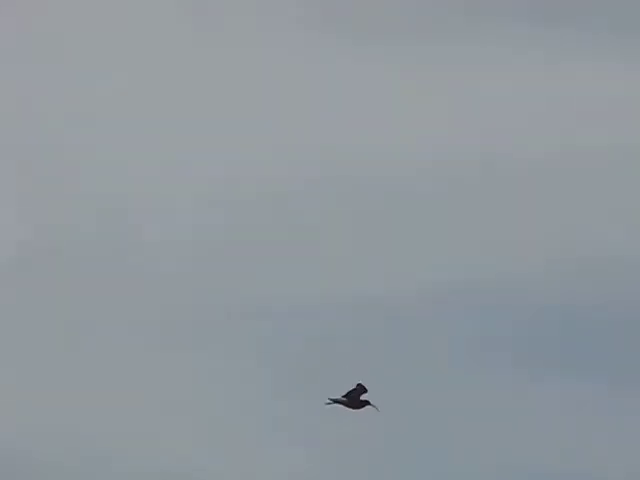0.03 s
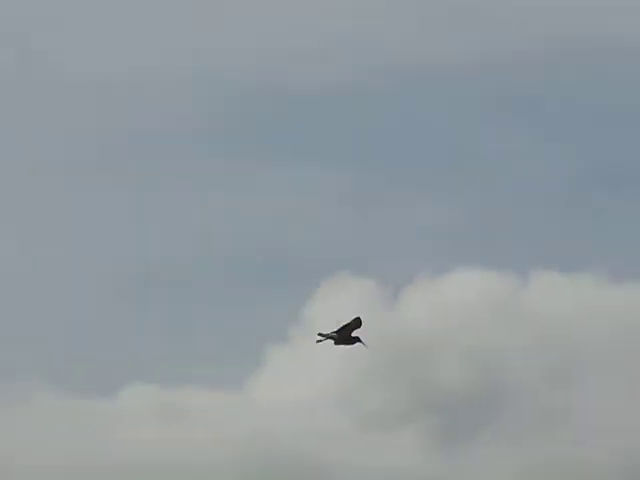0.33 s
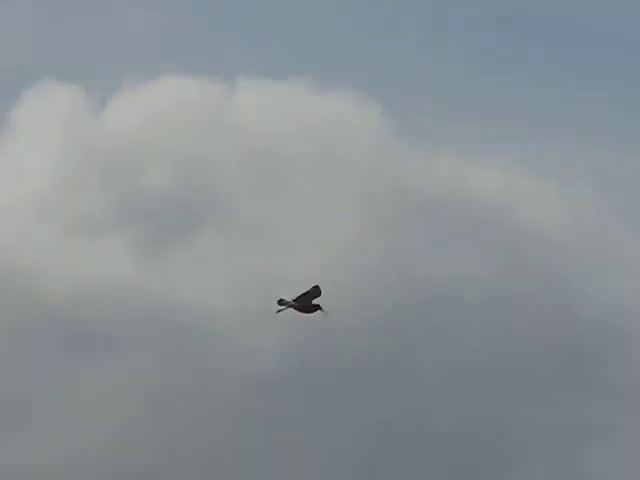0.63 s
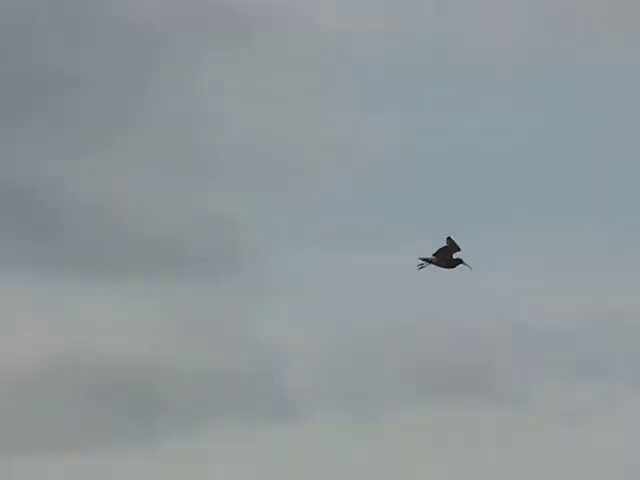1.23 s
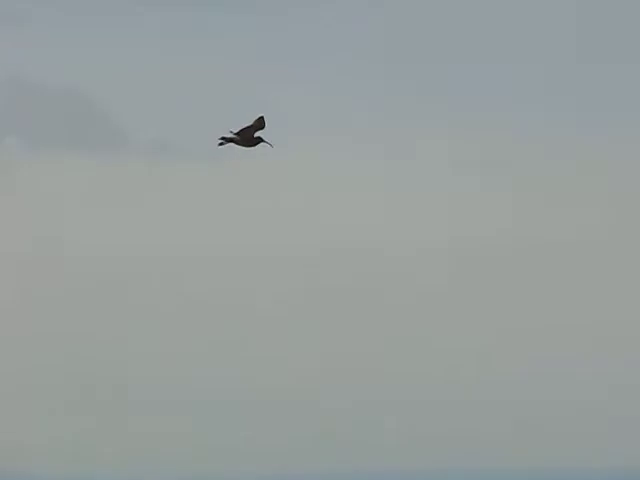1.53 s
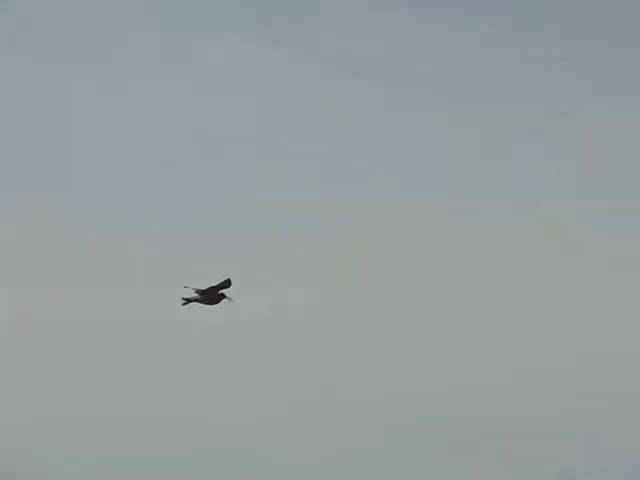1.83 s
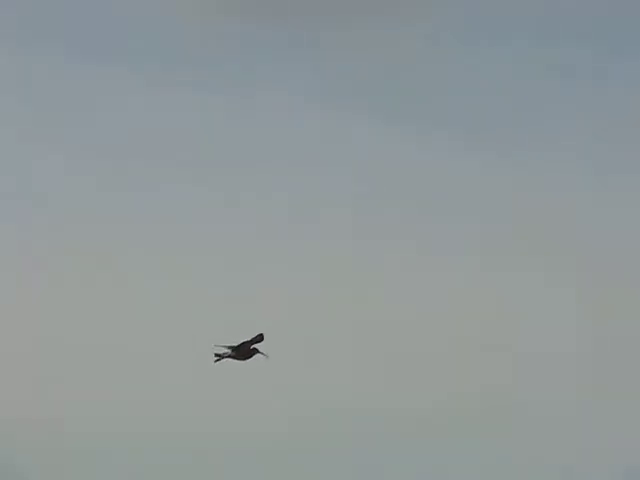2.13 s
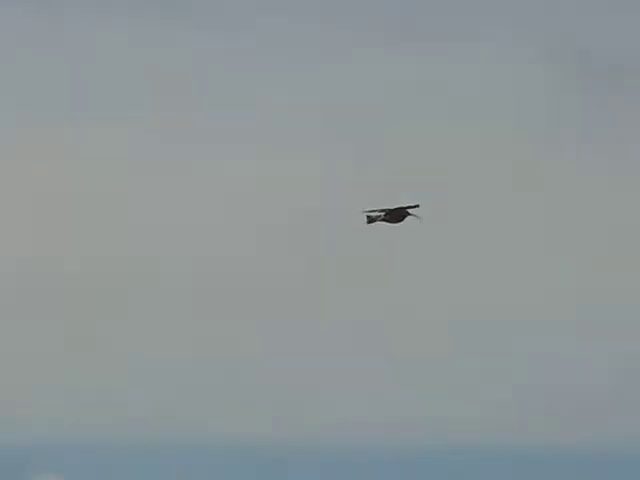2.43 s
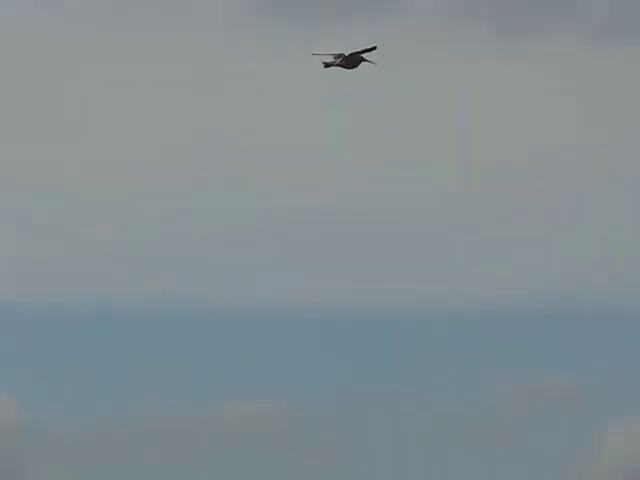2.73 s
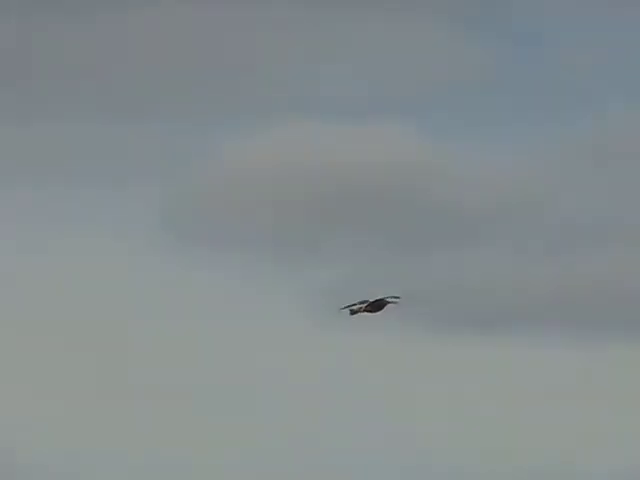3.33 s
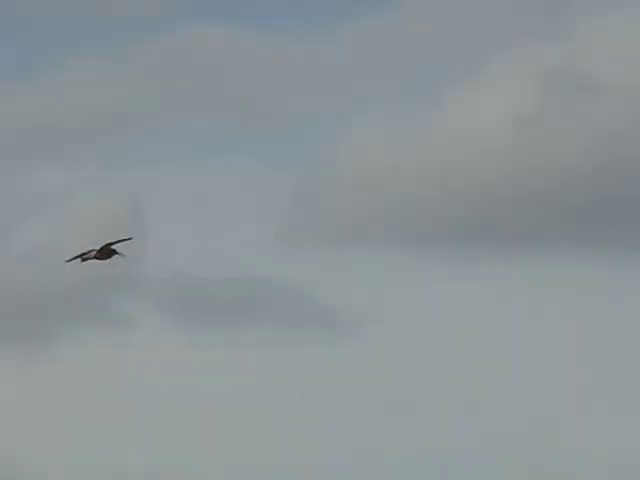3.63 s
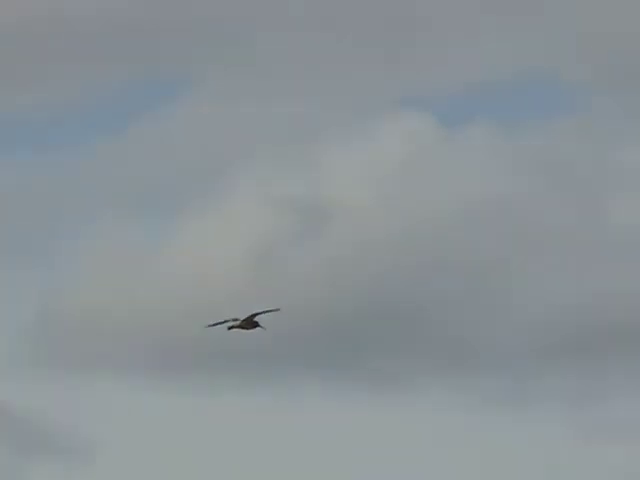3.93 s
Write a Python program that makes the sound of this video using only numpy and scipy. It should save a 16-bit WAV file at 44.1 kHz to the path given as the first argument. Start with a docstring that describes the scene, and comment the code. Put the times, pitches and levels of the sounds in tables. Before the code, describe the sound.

A curlew whistles and quavers in flight while strong wind rumbles on the microphone.

```python
"""A curlew calls in flight over open moorland: clear low whistles break up into a quavering upper
register, then give way to one long level whistle. Each note is a nearly pure tone with weak overtones,
faintly scattered by the ground. Turbulent gusts buffet the two microphone ports, mostly the right one,
and now and then overload the input. Under it all the camera hisses and whines faintly."""
import sys
import numpy as np
from scipy import signal
from scipy.fft import rfft, irfft
from scipy.io import wavfile
from scipy.ndimage import uniform_filter1d

SR = 44100
rng = np.random.default_rng(int(sys.argv[2]) if len(sys.argv) > 2 else 0)


def master(y):
    """Save y as 16-bit WAV."""
    cut = np.clip(np.atleast_2d(y).T, -1, 1)
    pcm = np.round(cut * 32767)  # scale
    wavfile.write(sys.argv[1], SR, pcm.astype(np.int16))


N = 176400
T = np.arange(N) / SR
EDGE_S = .004  # onset and release of a note
PURIFY_DB_PER_S = 12  # fading of the second harmonic against the fundamental

# Overtones of the low register. Each row: multiple of the pitch, relative level in dB.
LOW_OVERTONES = [(2, -28.5), (3, -38), (4, -53)]


def curlew():
    """Air absorption: the bird's two registers add and lose their highest treble on the way."""
    voice = low_whistles() + upper_notes() + register_slips()
    return amp(-1.5) * signal.lfilter(*signal.butter(3, 6440, fs=SR), voice)


def low_whistles():
    """Frequency modulation: each whistle glides along a contour, its overtones strongest at the attack."""
    # One contour per whistle. Each point: time in seconds, pitch in Hz, relative level in dB.
    contours = [
        [(0, 1620, -40), (.062, 1800, -35), (.134, 1828, -34), (.208, 1765, -33.5), (.222, 1990, -40)],
        [(.272, 1570, -38), (.296, 1894, -31), (.318, 1848, -32), (.347, 1920, -35), (.370, 1850, -36),
         (.396, 1927, -30), (.418, 1850, -37), (.435, 2090, -34.5)],
        [(.479, 1630, -37), (.495, 1960, -30.5), (.504, 2053, -30), (.513, 1920, -30), (.520, 2020, -52)],
        [(.657, 1490, -77.5), (.675, 1975, -23), (.685, 2080, -26.5), (.694, 1930, -29.5), (.701, 1970, -36)],
        [(.838, 1880, -31), (.852, 2084, -30), (.868, 1940, -36), (.880, 2205, -46.5), (.896, 2200, -31.5),
         (.914, 1950, -35)],
        [(1.027, 1670, -37.5), (1.062, 1820, -34.5), (1.089, 1747, -33.5), (1.107, 1936, -30.5),
         (1.117, 1944, -31), (1.131, 1730, -34)],
        [(1.518, 1727, -33), (1.572, 1755, -34), (1.579, 1745, -41), (1.586, 1820, -33)],
        [(2.168, 1657, -33.5), (2.212, 1683, -34.5), (2.223, 1690, -39)],
        [(2.702, 1900, -38), (2.726, 1656, -33.5), (2.756, 1816, -33), (2.774, 2126, -31.5), (2.783, 2150, -47)],
        [(2.942, 1610, -31), (3.005, 1556, -36), (3.055, 1682, -34), (3.258, 1738, -32.5), (3.432, 1760, -35),
         (3.576, 1727, -38.5), (3.718, 1608, -41.5), (3.802, 1600, -35.5), (3.830, 1770, -44)],
    ]
    # Timbre of each whistle. Each row: reediness in dB, relative level of the opening rasp in dB.
    timbres = [(-6.5, -74), (0, -54.5), (-3, -68), (4, -50), (2, -48), (0, -53.5), (5, -53), (4.5, -49),
               (-3.5, -88), (2, -48)]
    bite_db, bite_s, rasp_lead_s = 3.5, .02, .0099
    out = np.zeros(N)
    for contour, (reed_db, rasp_db) in zip(contours, timbres):
        times, hz, db = np.transpose(contour)
        t = np.arange(times[0] - EDGE_S / 2, times[-1] + EDGE_S / 2, 1 / SR)
        age = t - t[0]
        pitch = uniform_filter1d(np.interp(t, times, hz), size=300)
        reediness = reed_db + bite_db * np.exp(-age / bite_s) - PURIFY_DB_PER_S * age
        add(out, t[0], whistle(pitch, np.interp(t, times, db), LOW_OVERTONES, reediness))
        add(out, times[0] - rasp_lead_s, amp(rasp_db) * rasp())
    return out


def upper_notes():
    """Vibrato and tremolo: pitch and level quaver in phase, and some notes end in an upward flick."""
    # Upper-register notes. Each row: start and end in seconds, pitch in Hz, arch of the pitch in Hz,
    # relative level in dB, time of a quaver crest in seconds, quaver rate in Hz, flick in Hz and in dB.
    notes = [(.521, 0.613, 2490, 1, -40, 0.33, 13.5, 365, 4.5),
             (0.704, 0.738, 2590, 0, -36.5, .712, 15, 8, 2),
             (0.747, 0.777, 2510, -18, -39, .775, 9.4, 387, 2),
             (.915, 0.951, 2590, 2, -41, .940, 12, 453.5, -1),
             (1.133, 1.169, 2480, 4, -37.5, 1.167, 17, 11, 2),
             (1.18, 1.216, 2500, 7, -39.5, 1.38, 18.4, 3, 2.5),
             (1.235, 1.273, 2475, -14, -44, 1.44, 20, -7, 10),
             (1.29, 1.415, 2453, -4, -40.5, 1.2, 17, 662, 11),
             (1.584, 1.826, 2442, 25.5, -39.5, 1.74, 26.8, 4, 3.5),
             (1.841, 2.053, 2372, 31.5, -40.5, 1.872, 18, 540, 3.5),
             (2.222, 2.703, 2347, 63.5, -43.5, 2.414, 17.6, -13, -4)]
    # Overtones of the upper register. Each row: multiple of the pitch, relative level in dB.
    overtones = [(1.5, -33.5), (2, -27.5), (3, -41.5)]
    quaver_hz, quaver_db = 36.8, 2.5  # depths
    flick_rise_s, flick_hold_s = .027, .010
    out = np.zeros(N)
    for start, end, hz, arch_hz, db, crest, rate, flick_hz, flick_db in notes:
        t = np.arange(start, end, 1 / SR)
        quaver = np.cos(2 * np.pi * rate * (t - crest))
        arch = np.sin(np.pi * (t - start) / (end - start))
        flick_start = end - flick_rise_s - flick_hold_s
        flick = np.sin(np.pi / 2 * np.clip((t - flick_start) / flick_rise_s, 0, 1)) ** 4
        pitch = hz + arch_hz * arch + quaver_hz * quaver + flick_hz * flick
        level = db + quaver_db * quaver + flick_db * flick
        reediness = -flick_db * flick / 2 - PURIFY_DB_PER_S * (t - start)
        add(out, start, whistle(pitch, level, overtones, reediness))
    return out


def register_slips():
    """Register breaks: at some quaver crests the voice falls briefly back into the low register."""
    # Slips of the voice. Each row: start in seconds, relative level in dB.
    slips = [(0.554, -42), (0.726, -30.5), (1.161, -35), (1.212, -30), (1.268, -33.5), (1.758, -43),
             (1.816, -34.5), (2.523, -47)]
    length_s, from_hz, to_hz = .022, 2150, 1680
    progress = np.linspace(0, 1, round(length_s * SR))
    pitch = from_hz + (to_hz - from_hz) * progress ** 1.4
    out = np.zeros(N)
    for start, db in slips:
        add(out, start, whistle(pitch, db - 25 * (progress - .5) ** 2, LOW_OVERTONES))
    return out


def whistle(hz, db, overtones, reed_db=0):
    """A nearly periodic oscillation with jitter and shimmer; reediness lifts higher overtones more."""
    jitter, shimmer_db = .0053, .57
    t = np.arange(len(hz)) / SR
    drift = uniform_filter1d(rng.standard_normal((2, len(t))), size=120)
    pitch_drift, level_drift = uniform_filter1d(drift, size=80)
    phase = 2 * np.pi * np.cumsum(hz * (1 + jitter * unit(pitch_drift))) / SR
    tone = np.sin(phase) + sum(amp(level + reed_db * k / 2) * np.sin(k * phase) for k, level in overtones)
    edges = np.sin(np.pi / 2 * np.clip(np.minimum(t, t[-1] - t) / EDGE_S, 0, 1)) ** 2
    return np.sqrt(2) * tone * edges * amp(db + shimmer_db * unit(level_drift))


def rasp():
    """Onset transient: the voice starts with a rough upward scoop, heard in harmonics 2 to 4."""
    length_s, from_hz, to_hz, jitter, db_per_harmonic = .023, 1270, 1600, .027, -5.5
    progress = np.linspace(0, 1, round(length_s * SR))
    roughness = unit(uniform_filter1d(rng.standard_normal(len(progress)), size=40))
    pitch = (from_hz + (to_hz - from_hz) * progress) * (1 + jitter * roughness)
    phase = 2 * np.pi * np.cumsum(pitch) / SR
    harmonics = sum(amp(db_per_harmonic * (k - 2)) * np.sin(k * phase) for k in range(2, 5))
    return np.sin(np.pi * progress) * harmonics


def ground_scatter(call):
    """Diffuse reflection: the moor returns a faint, short tail that decays exponentially."""
    echo_db, t60_s, rise_s = -16.5, .14, .008
    t = T[:SR // 2]
    tail = rng.standard_normal((2, len(t))) * amp(-60 * t / t60_s) * np.minimum(t / rise_s, 1)
    tail /= np.linalg.norm(tail[0])
    return amp(echo_db) * signal.fftconvolve(call[None], tail, axes=1)[:, :N]


def wind():
    """Turbulence: each port has its own eddies, and a harder push makes a louder, brighter rumble."""
    # Wind strength at the left and right ports. Each row: time in seconds, relative level in dB.
    gusts_left = [(0.0, -31), (0.28, -21.5), (0.37, -34), (0.63, -25), (0.77, -33), (0.9, -21), (0.94, -40),
                  (1.05, -34), (1.12, -68), (1.17, -37), (1.31, -41), (1.36, -17.5), (1.45, -58),
                  (1.49, -17), (1.53, -47), (1.56, -25), (1.65, -48), (1.79, -19), (1.97, -44.5),
                  (2.15, -20), (2.2, -27.5), (2.34, -48), (2.38, -33.5), (2.61, -36), (2.71, -49),
                  (2.76, -35.5), (2.86, -33), (2.94, -15), (3.07, -11.5), (3.24, -31), (3.3, -11.5),
                  (3.34, -55.5), (3.38, -24), (3.41, -52), (3.53, -58), (3.6, -45), (3.65, -67),
                  (3.77, -14), (3.89, -37), (4.0, -28.0)]
    gusts_right = [(0.0, -16), (0.05, -13.5), (0.13, -23), (0.21, -13), (0.25, -18.5), (0.34, -19),
                   (0.4, -14), (0.44, -15.0), (0.64, -24), (0.7, -12.5), (0.75, -22), (0.78, -12.5),
                   (0.8, -18), (0.84, -8.5), (0.93, -21), (1.02, -12), (1.07, -32.5), (1.14, -23),
                   (1.17, -42.5), (1.21, -25.0), (1.24, -33.5), (1.29, -22.5), (1.33, -32), (1.39, -12),
                   (1.46, -17), (1.49, -15), (1.63, -20.5), (1.66, -34), (1.69, -18.5), (1.95, -18.5),
                   (1.97, -22), (2.0, -7.5), (2.11, -16.5), (2.18, -17.5), (2.24, -23.5), (2.27, -11.5),
                   (2.34, -21.5), (2.37, -18), (2.45, -11), (2.47, -22), (2.57, -15.5), (2.66, -20),
                   (2.7, -22.5), (2.76, -31.5), (2.82, -16), (2.87, -24.5), (2.9, -17), (2.97, -17.5),
                   (3.03, -9.5), (3.15, -18.5), (3.3, -14), (3.36, -20), (3.39, -20.5), (3.42, -30.5),
                   (3.48, -31.5), (3.51, -25.5), (3.55, -36.5), (3.63, -28), (3.66, -54), (3.73, -18.5),
                   (3.81, -16.5), (3.9, -13), (3.96, -12), (4.0, -18)]
    # Spectrum of the rumble. Each row: frequency in Hz, relative spectral density in dB.
    rumble_shape = [(15, -15), (40, -10.5), (80, -0.5), (150, 3.5), (300, 0.5), (480, -7.5), (800, -17),
                    (1400, -28.5), (2400, -46), (4000, -72.5), (8000, -95), (15000, -78.5)]
    # Growth of the bands. Each row: centre in Hz, dB gained for each dB of wind.
    steepness = [(40, 0.27), (150, 0.72), (400, 1.05), (1000, 1.3539), (3000, 1.97), (8000, 1.7)]
    usual_db, eddy_db, flutter_db, sputter_db, sputter_from_hz = -18.5, 2.38, 2.52, 3, 860
    centres, slopes = np.transpose(steepness)
    freqs = np.fft.rfftfreq(N, 1 / SR)
    out = np.zeros((2, N))
    for port, gusts in enumerate((gusts_left, gusts_right)):
        push_db = np.interp(T, *np.transpose(gusts)) - usual_db
        push_db += eddy_db * wander(hz=38.2) + flutter_db * wander(hz=172)
        rumble = noise(rumble_shape)
        spectrum = rfft(rumble)
        # The treble sputters at random and flaps with each pressure swing.
        swings = unit(uniform_filter1d(abs(signal.hilbert(rumble)), size=90))
        flap_db = sputter_db * wander(hz=130) + 20 * np.log10(swings)
        for share, hz, slope in zip(np.eye(len(centres)), centres, slopes):
            band = irfft(spectrum * log_interp(np.c_[centres, share], freqs), N)
            flapping = unit(amp(flap_db / (1 + (sputter_from_hz / hz) ** 2)))
            out[port] += band * amp(slope * push_db) * flapping
    return amp(-17) * out


def buffets():
    """Pressure pulses: a gust gives one low thump, with a short, dull crack of input overload."""
    # Sharp gusts. Each row: time in seconds, relative levels of thump and overload crack in dB,
    # left minus right in dB.
    sharp_gusts = [(0.172, -1, -36.5, -29), (.206, -12, -50, -10), (0.396, -6.5, -43, -6),
                   (0.667, -18, -39, -14), (.776, -0.5, -26.5, -34), (0.827, -19, -27.5, -16),
                   (0.837, -6.5, -30, -27), (0.843, -2, -19, -26), (.852, 0.5, -33, -9),
                   (.900, -3, -39, 22), (1.396, -5.5, -51, -23), (1.876, -6.5, -50, -27),
                   (2.000, -10.5, -49, -24), (2.019, -14, -40, -25), (2.051, -20, -35, -20),
                   (2.069, -16, -24, -25), (2.134, -6.5, -55, 2), (2.176, -6, -46, -18),
                   (2.279, 3, -26.5, -37), (2.312, -8, -46, -26), (2.376, -5, -48, -18),
                   (2.423, 1, -46, -38), (2.451, -13.5, -33, -16), (2.557, -5, -26.5, -34),
                   (2.586, -15, -42, -27), (2.664, -10, -46, -30), (3.018, -8.5, -21.5, 34),
                   (3.039, -1, -21.5, 32), (3.08, -15, -31, 16), (3.131, -5, -35, -36), (3.81, -3, -35, -9),
                   (3.857, -4.5, -26.5, -32.5), (3.885, -12, -31, -25)]
    thump_s, thump_gain_db, crack_s, crack_gain_db = .00068, -3, .00082, 3.5
    t = np.arange(-400, 800) / SR
    u = t / thump_s
    thump = -u * np.exp((1 - u ** 2) / 2)  # derivative of a Gaussian
    out = np.zeros((2, N))
    for time, thump_db, crack_db, pan_db in sharp_gusts:
        dull_noise = signal.lfilter(*signal.butter(2, 1840, fs=SR), rng.standard_normal(len(t)))
        dull_noise = signal.lfilter(*signal.butter(1, 5240, fs=SR), dull_noise)
        crack = unit(dull_noise) * np.exp(-abs(t) / crack_s)  # a noise burst stands for the clipping
        pulse = amp(thump_db + thump_gain_db) * thump + amp(crack_db + crack_gain_db) * crack
        add(out, time + t[0], sides(pan_db) * pulse)
    return out


def camera():
    """Ring modulation: a thin whine flips its sign with every picture, amid hiss and a haze of noise."""
    # Spectra of the hiss and of the haze around the whine.
    # Each row: frequency in Hz, relative spectral density in dB.
    hiss_shape = [(100, 8), (1000, 22), (2500, 10), (4000, 4.5), (7000, 1.5), (9000, -1), (12000, -4),
                  (15500, -10.5)]
    haze_shape = [(6000, -63.5), (7550, -20), (7870, 2.5), (8200, -18.5), (10000, -60)]
    whine_hz, frame_hz = 7867, 29.97
    flips = sum(np.sin(np.pi * k * frame_hz * T) / k for k in range(1, 12, 2))
    whine = amp(-67) * unit(flips * np.sin(2 * np.pi * whine_hz * T))
    floor = [amp(-54.5) * noise(hiss_shape) + amp(-69.5) * noise(haze_shape) for _ in range(2)]
    return sides(pan_db=1.5) * whine + np.array(floor)


def amp(db):
    """Amplitude ratio of a level in decibels."""
    return 10 ** (np.asarray(db) / 20)


def unit(x):
    """Normalisation to an rms of 1."""
    return x / np.sqrt(np.mean(x ** 2) + 1e-20)


def log_interp(points, hz):
    """Interpolation of a table along a logarithmic frequency axis."""
    freqs, values = np.transpose(points)
    return np.interp(np.log(hz + 1), np.log(freqs + 1), values)


def add(mix, start_s, sound):
    """Superposition of a sound on the mix from a given time."""
    part = mix[..., max(round(start_s * SR), 0):][..., :sound.shape[-1]]
    part += sound[..., :part.shape[-1]]


def sides(pan_db):
    """Level-difference panning: two gains with a mean of 1, the left pan_db above the right."""
    gains = amp(np.array([pan_db, -pan_db]) / 2)
    return (gains / gains.mean())[:, None]


def wander(hz):
    """Random fluctuation of rms 1, low-passed at a given rate."""
    freqs = np.fft.rfftfreq(N, 1 / SR)
    return unit(irfft(rfft(rng.standard_normal(N)) / (1 + (freqs / hz) ** 2) ** 2, N))


def noise(shape):
    """Spectral shaping of white noise, scaled to an rms of 1."""
    gains = amp(log_interp(shape, np.fft.rfftfreq(N, 1 / SR)))
    return unit(irfft(rfft(rng.standard_normal(N)) * gains, N))


def scene():
    """Superposition of the bird, a little to the right, the wind on the ports and the camera noise."""
    bird = curlew()
    return sides(pan_db=-4.3) * (bird + ground_scatter(bird)) + wind() + buffets() + camera()


def record(dry):
    """Saturation: the strongest gusts overload the input with a soft knee; a band limit follows."""
    ceiling, knee, cutoff_hz = .99, 3.8, 15900
    saturated = dry / (1 + abs(dry / ceiling) ** knee) ** (1 / knee)
    band_limit = signal.firwin(511, cutoff_hz, window=("kaiser", 9), fs=SR)
    return signal.oaconvolve(saturated, band_limit[None], "same")


dry = scene()
out = record(dry)
master(out)
```